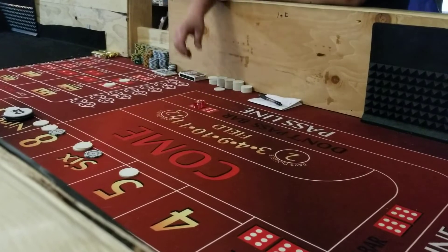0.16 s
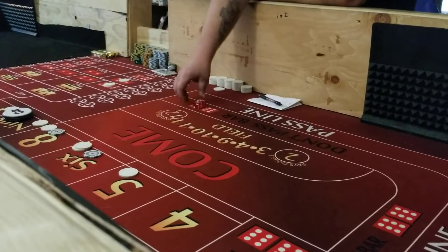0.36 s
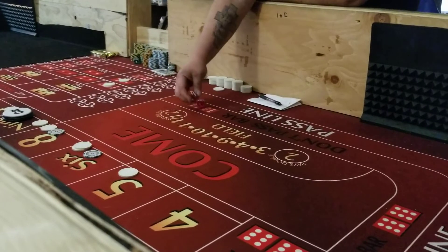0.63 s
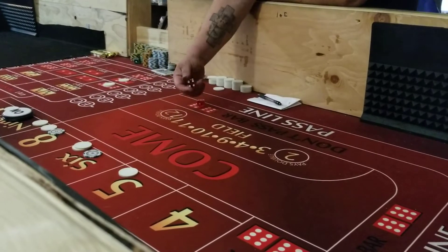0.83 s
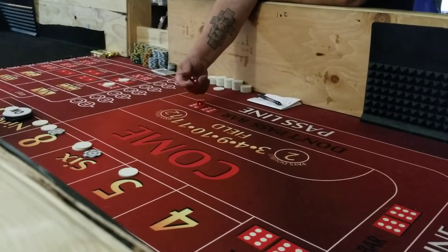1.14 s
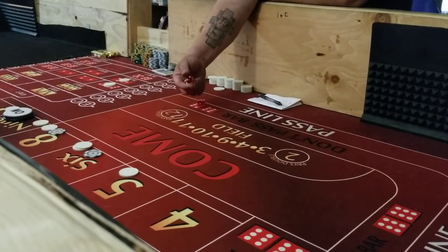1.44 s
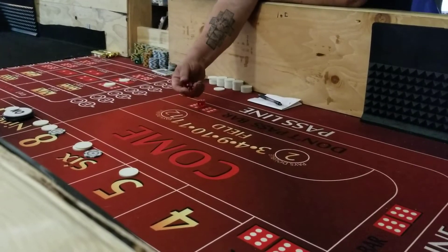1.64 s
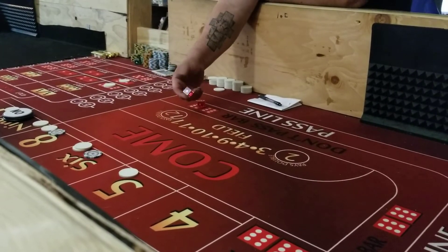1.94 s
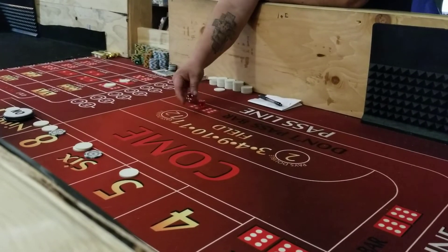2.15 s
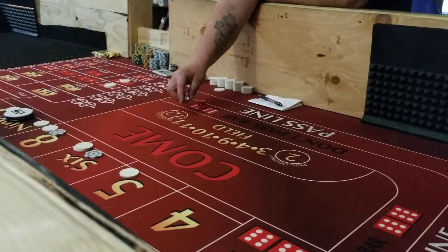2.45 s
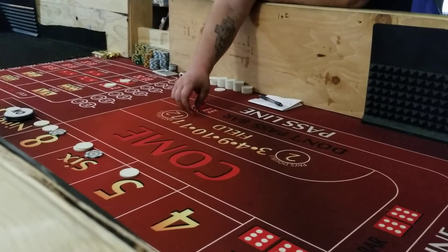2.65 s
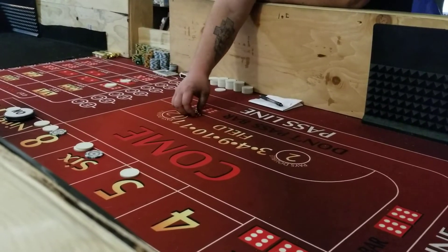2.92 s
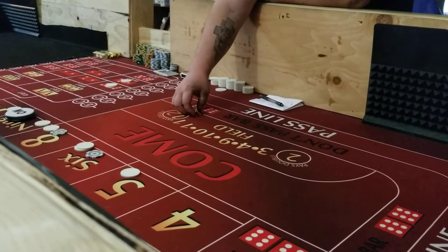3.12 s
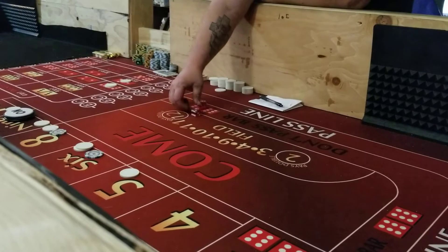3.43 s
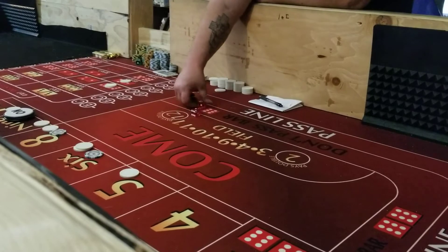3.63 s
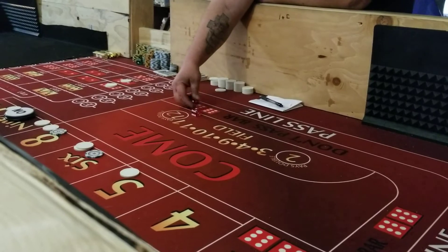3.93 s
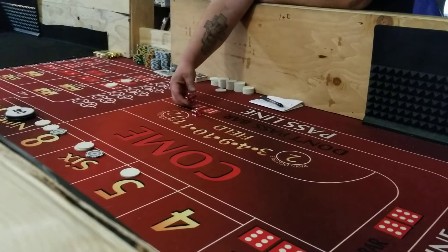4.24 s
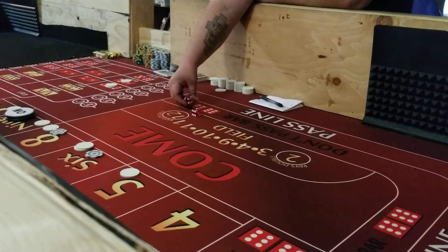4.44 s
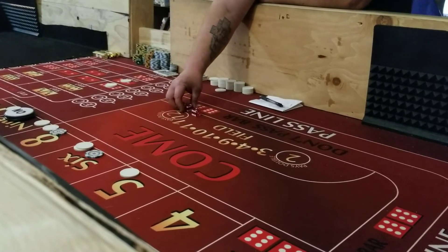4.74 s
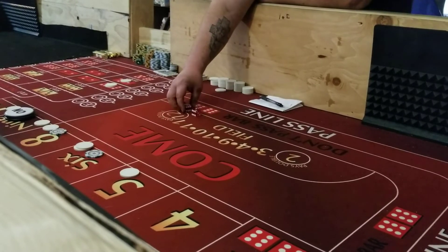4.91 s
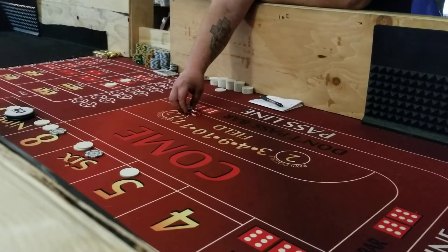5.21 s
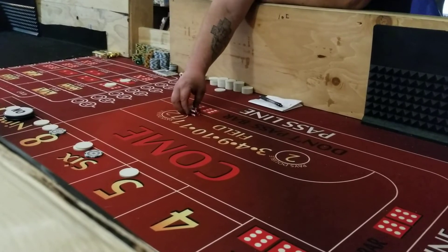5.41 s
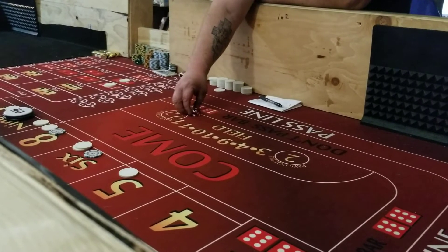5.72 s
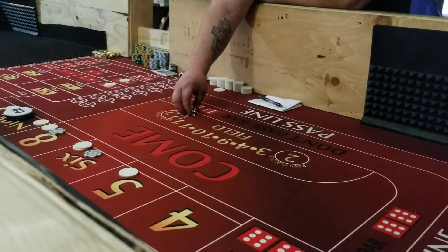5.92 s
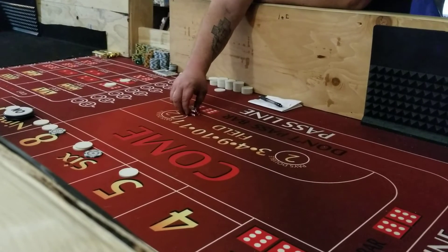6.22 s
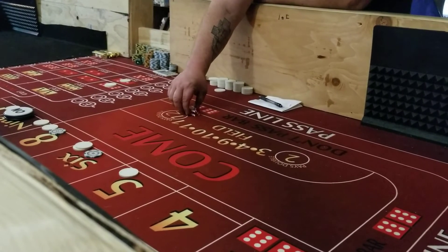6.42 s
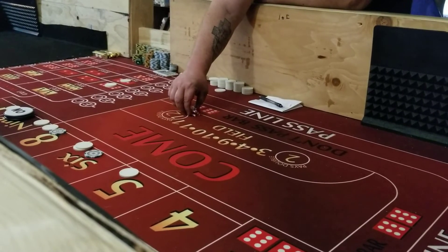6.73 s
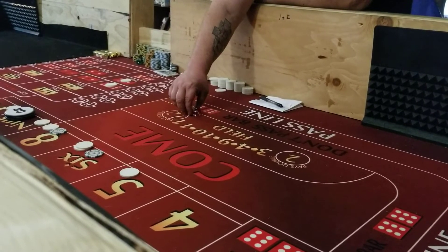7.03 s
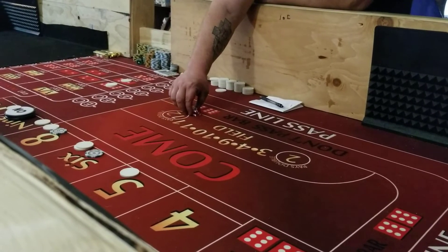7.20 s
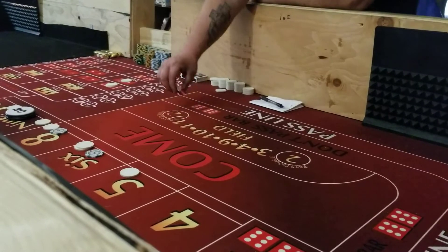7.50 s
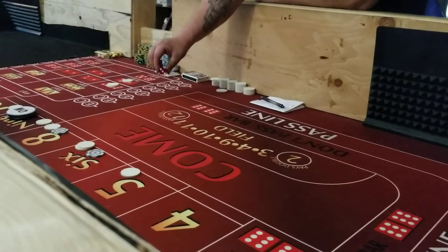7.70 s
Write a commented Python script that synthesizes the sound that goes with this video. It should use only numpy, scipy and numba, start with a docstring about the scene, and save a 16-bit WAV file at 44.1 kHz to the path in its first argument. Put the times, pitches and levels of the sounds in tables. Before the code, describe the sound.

A quiet small room carries a low, slightly wavering motor hum, air rumble and faint hiss throughout. A brief cloth rub opens, then from 0.16 to 0.45 s a wooden joint on the right creaks in a rapid run of bright snaps, with soft frame bumps and a die click near 0.45. A slower creaking run follows at 0.67-0.92, then single sharp cracks scattered from 1.0 to 1.6 and another at 2.0. Around 2.4 cloth brushes lightly; a dull thump lands at 2.7. Between 3.3 and 4.1 small dice click on felt among short swishes. A firmer double knock comes at 4.7, a soft swish at 4.9, and two clear dice clicks with rustling near 5.6. After a lull, a crack with a low thump sounds at 6.95, another crack at 7.09, then longer cloth drags from 7.1 to 7.8 with faint bumps.

```python
"""A wooden joint creaks on the right in two runs of stick-slip snaps, the second slower, then in single cracks.
The frame is bumped and a die clicks early on; then dice click and thump on a felt table between cloth strokes.
Late on come two last cracks, the first with a low thump, longer drags of cloth along the rail, and soft bumps.
A motor hum, air rumble and hiss lie under it all; resonators and shaped noise sound in a small synthetic room."""
import sys
import numpy as np
from scipy import signal
from scipy.fft import rfft, irfft
from scipy.io import wavfile
from scipy.ndimage import uniform_filter1d
from numba import njit

SR = 44100
rng = np.random.default_rng(int(sys.argv[2]) if len(sys.argv) > 2 else 0)


def output_pcm(signal):
    """Save a mono or channel-first signal as 16-bit PCM at the path in sys.argv[1].

    Samples are clipped to [-1, 1] before scaling.
    """
    pcm = np.clip(np.atleast_2d(signal).T, -1, 1) * 32767
    wavfile.write(sys.argv[1], SR, np.round(pcm).astype(np.int16))


def elevation(decibels):
    """Turn decibel levels (scalar or array-like) into linear amplitude ratios."""
    levels = np.asarray(decibels, float)
    return 10 ** (levels / 20)


N = 346626

# tone of the left port, turned away from the table sounds: (f/Hz, gain/dB)
SHADOW = [(100, -4), (300, 2), (600, 1), (1500, -9), (5000, -7.5), (13000, -6)]


def along(points, hz):
    """Value of a (f/Hz, value) table, joined on a log frequency axis."""
    f, value = np.transpose(points)
    return np.interp(np.log(np.maximum(hz, 1)), np.log(f), value)


def colour(x, points):
    """Causal minimum-phase filter with the gain of a (f/Hz, gain/dB) table, from the folded cepstrum."""
    size = 2048
    gain = elevation(along(points, np.fft.rfftfreq(size, 1 / SR)))
    cepstrum = irfft(np.log(gain))
    cepstrum[1:size // 2] *= 2
    cepstrum[size // 2 + 1:] = 0
    impulse = irfft(np.exp(rfft(cepstrum)))
    return signal.fftconvolve(np.atleast_2d(x), impulse[None], axes=1)[:, :x.shape[-1]]


def ring(x, hz, width_hz):
    """Resonance with gain 1 at its centre."""
    return signal.lfilter(*signal.iirpeak(hz, hz / width_hz, fs=SR), x)


def unit(x):
    """Scale to rms 1."""
    return x / np.sqrt(np.mean(x ** 2))


def pair(count):
    """Left and right noise, alike in the bass and unrelated in the treble."""
    # left-right correlation: (f/Hz, correlation)
    likeness = [(60, .97), (130, .95), (290, .86), (640, .5), (1400, .01), (16000, .01)]
    like = np.clip(along(likeness, np.fft.rfftfreq(count, 1 / SR)), 0, 1)
    mid, side = rfft(rng.standard_normal((2, count))) * np.sqrt([1 + like, 1 - like])
    return irfft([mid + side, mid - side], count) / 2


def walk(rate):
    """Random levels held 1 / rate s and smoothed; spread near 1."""
    hold = int(SR / rate)
    steps = np.repeat(rng.standard_normal(N // hold + 1), hold)
    return unit(uniform_filter1d(steps, hold)[:N])


def spikes(s, db):
    """Single-sample impulses at times s."""
    x = np.zeros(N)
    x[np.round(np.asarray(s) * SR).astype(int)] = elevation(np.asarray(db))
    return x


def room(near_db, near_ms, direct_db, left_db):
    """Response of both ports: direct sound, echoes and close scatter favour the right, the tail reaches both."""
    # decay of the diffuse tail: (f/Hz, t60/s)
    room_t60 = [(125, 0.4), (500, 0.35), (2000, 0.31), (6000, 0.36), (13000, 0.15)]
    # rail, board and far wall: (delay/ms, level over direct/dB)
    echoes = [(2.3, -5), (6.2, -7), (18.2, -12)]
    count = SR // 2
    t, hz = np.arange(count) / SR, np.fft.rfftfreq(count, 1 / SR)
    noise, tail = rfft(pair(count)), 0
    for centre in 62.5 * 2. ** np.arange(9):  # overlapping octave bands, each with its own decay
        octaves = np.log2(np.maximum(hz, 1) / centre)
        band = np.cos(np.pi / 2 * np.clip(octaves, -1, 1)) ** 2
        decay = elevation(-60 * t / along(room_t60, centre))
        tail = tail + irfft(noise * band, count) * decay
    tail = tail * (1 - np.exp(-t / np.array([[.012], [.004]])))  # builds up later on the left

    near = elevation(near_db) * np.exp(-1000 * t / near_ms) * pair(count)
    for ms, db in [(0, 0.017)] + echoes:
        near[:, int(ms * SR / 1000)] += elevation(direct_db + db)
    near[0] = colour(near[0], [(300, 0.012), (1500, left_db)])  # bass bends round the body, treble does not
    out = elevation(-25.5) * tail + near
    return np.vstack([colour(out[0], SHADOW), out[1]])


def heard(x, response):
    """A dry source through a room response."""
    return signal.fftconvolve(np.atleast_2d(x), response, axes=1)[:, :N]


def background():
    """A motor's hum, its lines wavering together in pitch and each alone in level, over air rumble and hiss."""
    # hum lines, the upper three not multiples of the lowest: (centre f/Hz, rms level before wavering/dB)
    hum_lines = [(59.2, -64), (118.4, -64.5), (177.6, -76), (301.5, -73.5), (360.7, -78.5), (419.9, -74.5)]
    # tone of the air noise: (f/Hz, relative level/dB)
    air_tone = [(24, -23), (40, -4), (124, -8.5), (167, -10), (226, -3), (262, -10), (422, -9.5),
                (556, -17), (646, -15), (697, -21.5), (1180, -29.5), (8130, -39.5), (14800, -34),
                (16000, -48.5)]
    # tilt of the whole bed between the ears: (f/Hz, left minus right/dB)
    balance = [(60, 3), (110, -2.5), (200, -4.5), (380, -8), (700, -5), (1290, -7.5), (2380, -5),
               (4400, -2), (8120, -2), (15000, -2)]
    turn = 2 * np.pi * np.cumsum(1 + 0.01257 * walk(14)) / SR
    hum = 0
    for hz, db in hum_lines:
        hum = hum + np.sqrt(2) * elevation(db + 2.14 * walk(9)) * np.sin(hz * turn)
    air = elevation(-62.5 + 0.44 * walk(3.35)) * unit(colour(pair(N), air_tone))
    half_db = along(balance, np.fft.rfftfreq(N, 1 / SR)) / 2
    return irfft(rfft(hum + air) * elevation(np.array([half_db, -half_db])), N)


@njit
def sweep(x, hz, width_hz):
    """State-variable band-pass whose centre moves, gain 1 at the centre."""
    y, band, low = np.empty(len(x)), 0., 0.
    for i in range(len(x)):
        g, damping = np.tan(np.pi * hz[i] / SR), width_hz / hz[i]
        v = (band + g * (x[i] - low)) / (1 + g * (g + damping))
        band = 2 * v - band
        low = low + 2 * g * v
        y[i] = damping * v
    return y


def strokes(rows, fall_db_s):
    """Summed power of (start/s, rise/s, hold/s, level/dB) strokes: each climbs, holds, then dies away."""
    climb_db = 15.5
    t, power = np.arange(N) / SR, 0
    for start, rise, hold, db in rows:
        climb = climb_db * np.clip((t - start) / max(rise, .002) - 1, -1, 0)
        fall = fall_db_s * np.maximum(t - start - rise - hold, 0)
        power = power + (t > start) * elevation(2 * (db + climb - fall))
    return power


def cloth():
    """Fibres catch and slip: grainy noise from a moving patch, so the room blurs it without fixed echoes."""
    # dull rustle: cloth rubs, and at 3.3-3.5 s the dull wash after dice clicks:
    # (start/s, rise/s, hold/s, drive/dB, centre f/Hz)
    dull = np.array([(-0.02, 0.014, 0.0045, -55.5, 1710), (2.366, 0.041, 0.061, -73.5, 2630),
                     (3.339, 0.02, .03, -61.5, 1660), (3.447, 0.086, 0.042, -68, 2200),
                     (5.56, 0.088, .01, -64.5, 1960), (7.127, 0.076, 0.054, -58.5, 1870),
                     (7.273, .11, 0.17, -56, 2220), (7.54, 0.026, 0.24, -58, 2240)])
    # skin and cloth brushing the felt, bright: (start/s, rise/s, hold/s, drive/dB, fine hiss over hiss/dB)
    swishes = np.array([(2.389, 0.04, .1, -59, 7), (3.18, .05, 0.067, -94, 20),
                        (3.324, 0.02, 0.17, -77, 11), (3.5, .018, 0.017, -70, 13),
                        (3.56, .03, 0.067, -79.5, 13.5), (3.708, 0.034, .02, -93, 22),
                        (4.9, .065, 0.1, -75.5, 8), (5.563, 0.012, .01, -69.5, 5),
                        (5.625, 0.011, 0.0091, -63.5, -3), (7.1, .03, .01, -65, -8),
                        (7.218, 0.097, 0.31, -65, -1.5), (7.538, .04, 0.15, -58, 1),
                        (7.786, .025, 0.0089, -73, 8)])
    # tone of the dull rustle: (f/Hz, relative level/dB)
    rustle = [(300, 3), (800, -1), (1500, -3.5), (2500, -7.5), (3500, -7.5), (4300, -13), (6000, -14.5)]
    # tone of the bright brushing: (f/Hz, relative level/dB)
    hiss = [(1700, -28), (2500, -12), (3400, -15.5), (5000, -11.5), (7200, -8.5), (9500, -11.5),
            (11500, -15)]
    # tone of its topmost part: (f/Hz, relative level/dB)
    fine_hiss = [(8000, -22), (10800, -2.5), (12300, 3), (14500, 3), (16000, -6.5)]
    dull_fall_db_s, swish_fall_db_s = 195, 220
    centre_hz = np.interp(np.arange(N) / SR, dull[:, 0] + dull[:, 1], dull[:, 4])
    fine = np.column_stack([swishes[:, :3], swishes[:, 3] + swishes[:, 4]])
    grain_db = 0.9 * walk(60)
    layers = ((strokes(dull[:, :4], dull_fall_db_s), rustle, 0.35),
              (strokes(swishes[:, :4], swish_fall_db_s), hiss, 0.44),
              (strokes(fine, swish_fall_db_s), fine_hiss, .22))
    out = 0
    for power, points, t60 in layers:
        power = power * elevation(2 * grain_db)
        fall = elevation(-120 / t60 / SR)  # power falls 60 dB in t60
        late = signal.lfilter([1 - fall], [1, -fall], power)
        noise = colour(rng.standard_normal((2, N)), points)
        if points is rustle:  # a resonance gliding from one rustle to the next
            noise = noise + elevation(8.0) * np.array([sweep(n, centre_hz, 740.0) for n in noise])
        level = np.sqrt([0.55 * power + 0.67 * late, 1.86 * power + 0.48 * late])  # left, right
        out = out + level * unit(noise)
    return np.vstack([colour(out[0], SHADOW), out[1]])


def struck(push, modes):
    """A force ringing a set of (f/Hz, level/dB, t60/s) modes."""
    t = np.arange(SR // 2) / SR
    body = sum(elevation(db - 60 * t / t60) * np.sin(2 * np.pi * hz * t) for hz, db, t60 in modes)
    return signal.fftconvolve(push, body)[:N]


def table():
    """A push through the felt rings the board, the longer the contact the duller; bumps ring the frame."""
    # dull thumps on the table top, one low thump under the crack at 6.95 s:
    # (t/s, drive/dB, contact time constant/ms)
    thumps = [(1.923, -50, 0.48), (1.949, -54, 0.56), (2.7, -35.5, 0.82), (2.729, -47.5, 0.49),
              (3.357, -56.5, 0.13), (4.048, -50.5, 0.18), (4.71, -39, 0.17), (4.727, -38.5, 0.098),
              (4.755, -68, 0.36), (6.951, -47, 0.14), (7.59, -51, 0.31)]
    # modes of the board: (f/Hz, relative level/dB, t60/s)
    table_modes = [(127, -17, 0.11), (219, 2, 0.087), (250, 0, 0.056), (314, 3, 0.034), (438, 1.5, 0.067),
                   (593, -4, 0.029), (719, 4.5, 0.034), (805, -2, 0.018)]
    # dense high modes of the board: (f/Hz, gain/dB)
    knock = [(400, -47), (900, -5), (1500, 3), (2500, -0.5), (3500, -17), (6000, -13)]
    # body weight bumping the table frame: (t/s, drive/dB)
    bumps = [(0.279, -44), (0.288, -45), (0.35, -56), (0.415, -42.5), (0.547, -45.5), (4.742, -43),
             (4.78, -55), (7.74, -56), (7.81, -60)]
    # modes of the frame: (f/Hz, relative level/dB, t60/s)
    frame_modes = [(90, -2, 0.037), (124, 2, 0.21), (166, 0, 0.044)]
    push = np.zeros(N)
    for s, db, ms in thumps:
        fall = np.exp(-1000 / SR / np.clip(ms, .05, 5))
        two_poles = np.convolve([1, -fall], [1, -fall])
        push += signal.lfilter([(1 - fall) ** 2], two_poles, spikes([s], [db]))
    board = struck(push, table_modes) + elevation(33.5) * colour(push, knock)[0]

    nudge = uniform_filter1d(spikes(*np.transpose(bumps)), int(0.0023 * SR))  # each bump lasts 2.3 ms
    frame = struck(nudge, frame_modes)
    board_heard = heard(elevation(-7.5) * board, room(-21.5, 30.0, -12.5, -1.8))
    return board_heard + heard(elevation(-5) * frame, room(-26.09, 5.8, 5.8, -0.9))


def dice():
    """Small hard cubes: a short low ring with its octave fills the room; a higher ring is a brief dry tick."""
    # dice touching each other or the felt: (t/s, drive/dB, low ring f/Hz, high ring f/Hz, high ring drive/dB)
    clicks = [(0.449, -29, 2070, 5160, -10), (2.7334, -60.5, 1310, 6800, 2.5),
              (2.978, -46.5, 1890, 5400, -22), (3.3578, -47.5, 1880, 7600, -6.5),
              (3.4658, -46, 1980, 7330, -9.5), (3.5203, -40.5, 2400, 7640, -6),
              (3.8432, -56, 1740, 4830, -22), (3.88, -39, 1640, 7400, -24.5),
              (3.9413, -48, 1800, 4400, -12.5), (4.0527, -52.5, 2170, 4160, -8),
              (4.4996, -57, 2140, 4390, -12), (5.5732, -37.5, 2120, 4340, -19),
              (5.6368, -35, 1800, 7200, -15), (5.6653, -56, 1800, 6470, -16),
              (6.41, -70.5, 1700, 5700, 8.5)]
    body = edge = 0
    for s, db, low_hz, high_hz, high_db in clicks:
        hit = spikes([s], [db])
        low = ring(ring(hit, low_hz, 0.24 * low_hz), low_hz, 0.24 * low_hz)
        octave = elevation(high_db - 22.0) * ring(hit, 2 * low_hz, 0.19 * low_hz)
        body = body + elevation(29.5) * (low + octave)
        edge = edge + elevation(26.5 + high_db) * ring(hit, high_hz, 0.15 * high_hz)
    return heard(body, room(-24.9, 5.4, -7, -11)) + heard(edge, room(-24.2, 2.7, -2.2, -23))


def slips():
    """Times, tick drives and extra knock: one slip per whole step of the slide, then the single cracks."""
    # two runs of slips as the joint slides, faster and slower: (t/s, slips per s)
    runs = [
        [(0.1636, 82.8), (0.1899, 86.8), (0.2177, 67.5), (0.2552, 102.1), (0.2783, 54.6), (0.3233, 119.2),
         (0.3466, 78.8), (0.3801, 93.6), (0.442, 59.2)],
        [(0.674, 30.2), (0.7099, 41.5), (0.7784, 60.7), (0.7949, 25.6), (0.8185, 55.4), (0.8708, 49.1),
         (0.92, 29.9)],
    ]
    # load on the joint during the runs: (t/s, tick drive/dB)
    load = [(0.164, -31), (0.175, -24), (0.30, -25.5), (0.44, -27), (0.674, -21.5), (0.703, -27),
            (0.725, -27.5), (0.78, -30.5), (0.868, -34.5), (0.888, -33), (0.92, -36.5)]
    # single cracks: (t/s, tick drive/dB, knock above the usual/dB)
    cracks = [(0.4688, -33.5, 5), (0.5396, -24.5, 0.5), (0.5671, -33, -2), (1.0077, -25, 0),
              (1.1142, -43, 0.5), (1.1993, -28, 1), (1.282, -26.5, -1), (1.4332, -25.5, -0.5),
              (1.5485, -27, -0.5), (1.6156, -41.5, -4), (2.0105, -26, 2.5), (6.95, -22.5, 1),
              (7.0876, -28, 0)]
    scatter_db = 1.1
    s = []
    for run in runs:
        at, rate = np.transpose(run)
        t = np.arange(at[0], at[-1], 1 / SR)
        steps = np.cumsum(np.interp(t, at, rate)) / SR
        s += list(np.interp(np.arange(int(steps[-1]) + 1), steps, t))
    db = np.interp(s, *np.transpose(load)) + scatter_db * rng.standard_normal(len(s))
    return np.hstack([[s, db, np.zeros(len(s))], np.transpose(cracks)])


def creak():
    """Every slip is nearly the same crack: a bright tick, and a knock ringing the wood a little differently."""
    # resonances of the wood: (f/Hz, width/Hz, relative level/dB)
    wood_modes = [(205, 100, 3.5), (465.5, 25, 3.5), (700, 30, 0), (1200, 14, -9), (1485, 24, -4),
                  (1930, 13, -8), (2620, 60, -8), (6290, 110, -10), (7330, 220, -8)]
    # overall tone of the knock: (f/Hz, gain/dB)
    wood_colour = [(150, -8), (500, -1.5), (1000, 1.5), (2000, 5), (3200, 3), (4500, 0.5), (7500, -2),
                   (10000, 1), (16000, -7)]
    tick_hz, tick_width_hz = 13400, 5500
    s, db, extra_db = slips()
    # -32.5 dB knock drive under a -27.5 dB tick; weak slips lose tick faster than knock
    knock_db = -32.5 + .5 * (db + 27.5) + extra_db
    tick = ring(spikes(s, db), tick_hz, tick_width_hz)
    tick = elevation(23.5) * ring(tick, tick_hz, tick_width_hz)

    scatter_db = 3 * rng.standard_normal((len(s), len(wood_modes)))
    wood = spikes(s, knock_db)
    for (hz, width_hz, mode_db), own_db in zip(wood_modes, scatter_db.T):
        wood = wood + ring(spikes(s, knock_db + mode_db + own_db + 4.5), hz, width_hz)
    wood = colour(wood, wood_colour)
    bright = heard(tick, room(-30, 4.5, -2.5, -14))
    return bright + heard(elevation(19) * wood, room(-20.9, 4.7, -18.5, -8))


def scene():
    """Table sounds through the microphone ports, over the background."""
    # port resonance and the dip above it, left and right: (f/Hz, gain/dB)
    left_port = [(6500, 2), (7600, -12.5), (9000, -1.5), (13000, -6), (16000, -23)]
    right_port = [(7500, 3.5), (8800, -12.5), (10500, -5.5), (13300, -2.5), (16000, -6)]
    events = creak() + dice() + table() + cloth()
    # small bodies radiate no deep bass
    events = signal.sosfilt(signal.butter(2, 75, "high", fs=SR, output="sos"), events)
    ports = np.vstack([colour(events[0], left_port), colour(events[1], right_port)])
    return ports + background()


def band_limit(x):
    """A steep low-pass at the top of the band."""
    return signal.sosfilt(signal.butter(12, 16790, fs=SR, output="sos"), x)


def record(dry):
    """The recorder cuts the top steeply above 15.9 kHz."""
    mix = signal.sosfilt(signal.ellip(8, .2, 60, 15900, fs=SR, output="sos"), dry)
    return band_limit(mix)


dry = scene()
out = record(dry)
output_pcm(out)
```